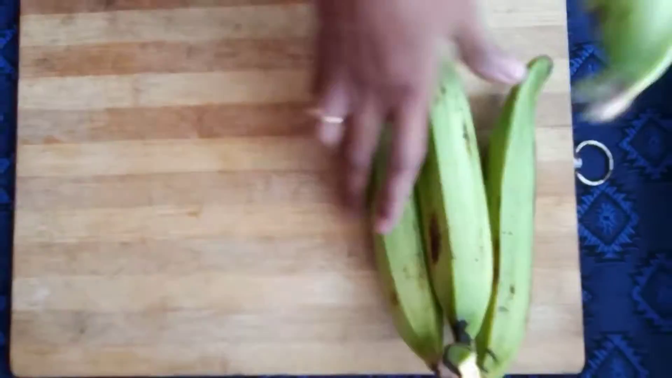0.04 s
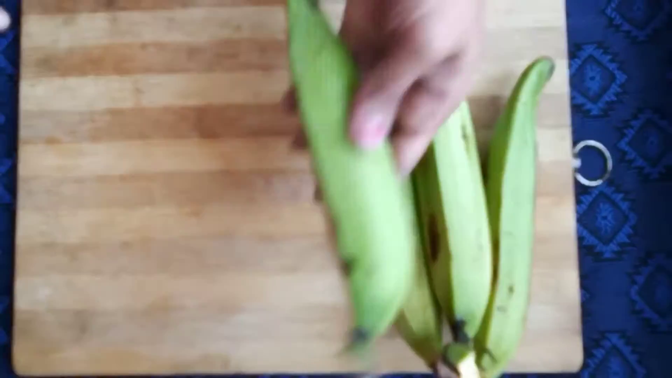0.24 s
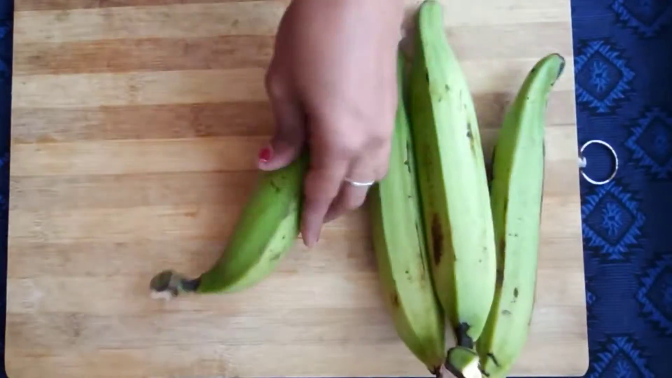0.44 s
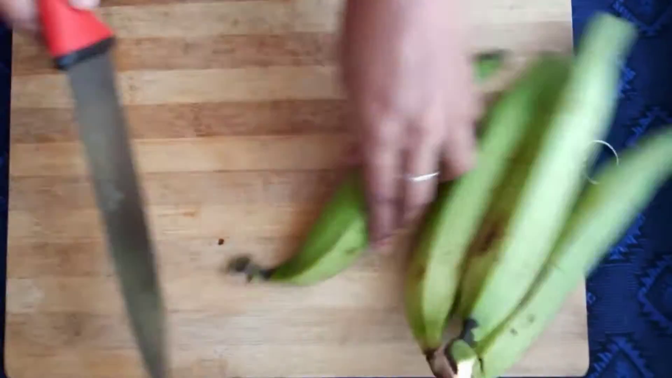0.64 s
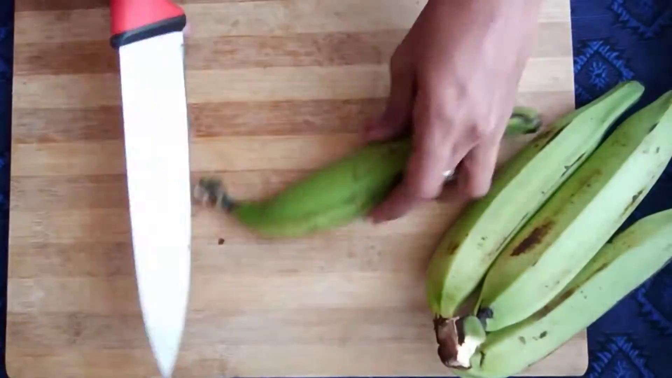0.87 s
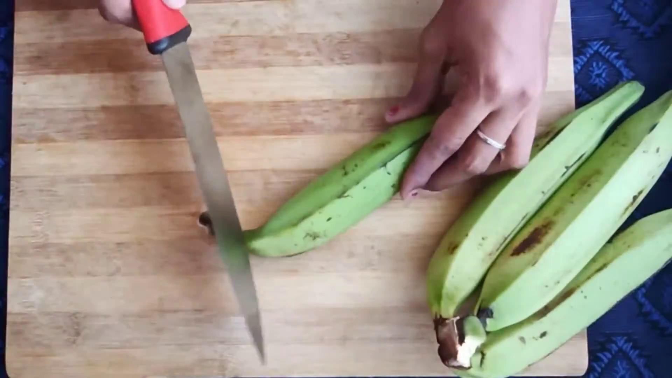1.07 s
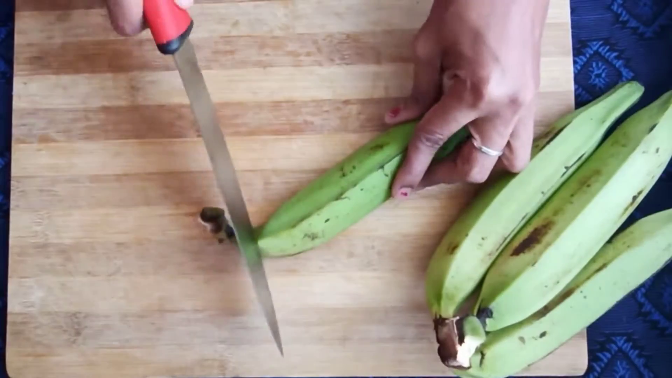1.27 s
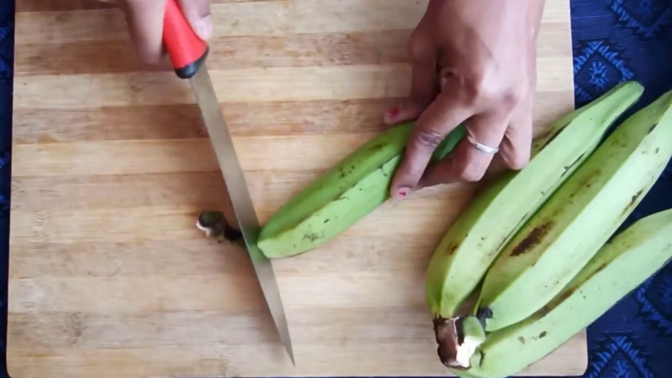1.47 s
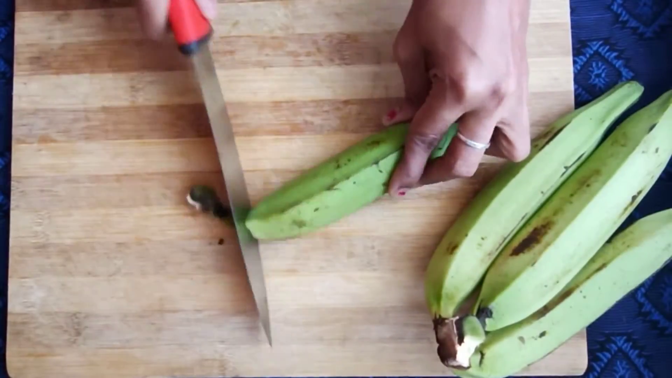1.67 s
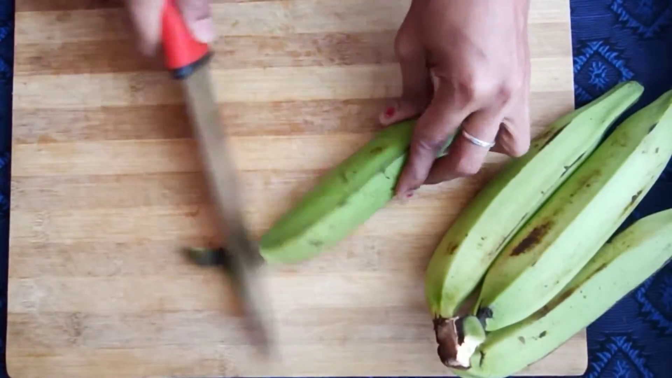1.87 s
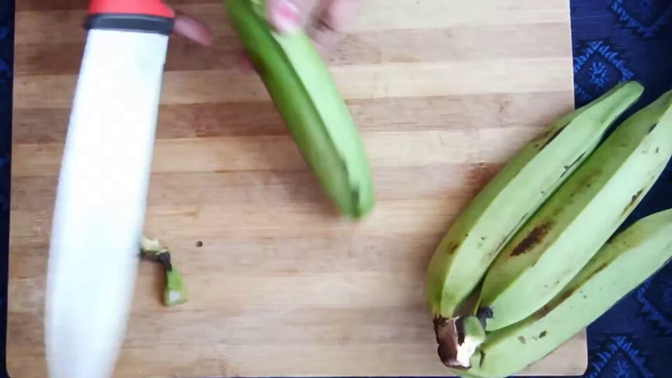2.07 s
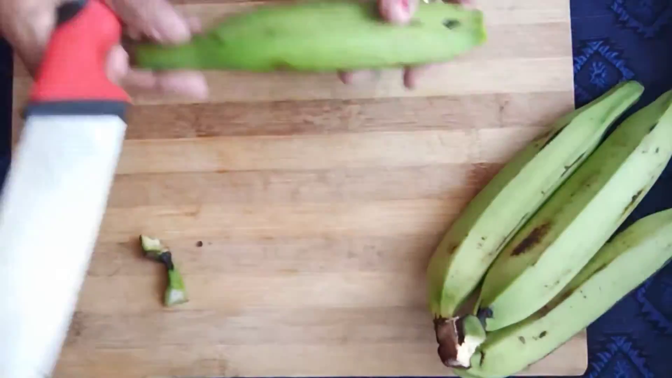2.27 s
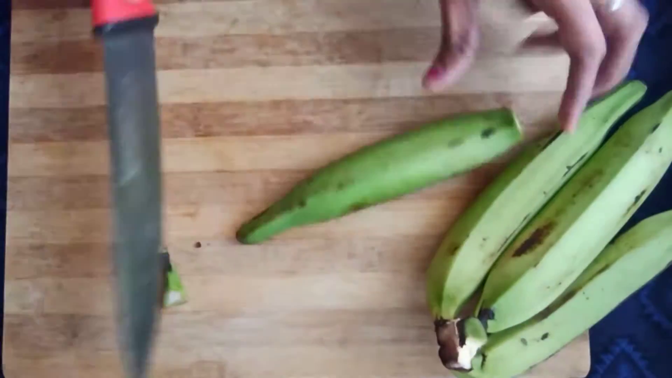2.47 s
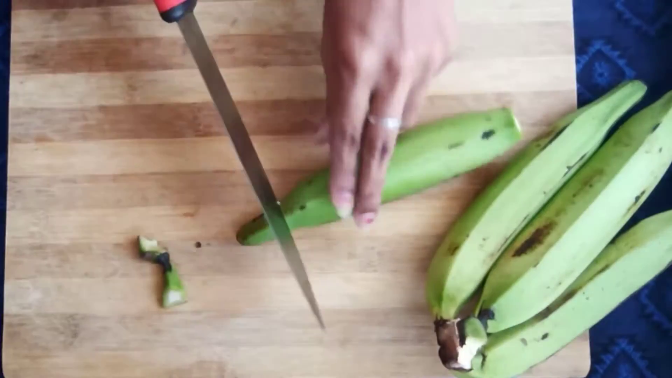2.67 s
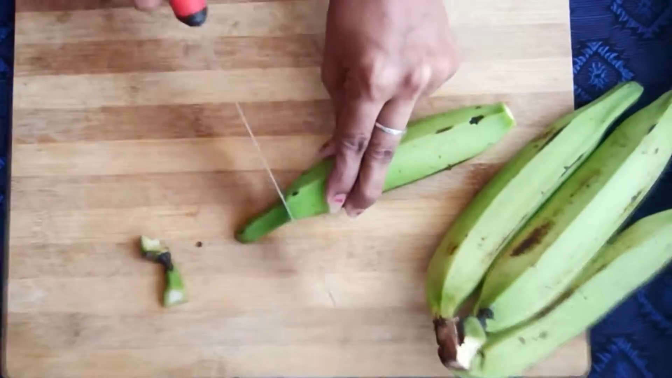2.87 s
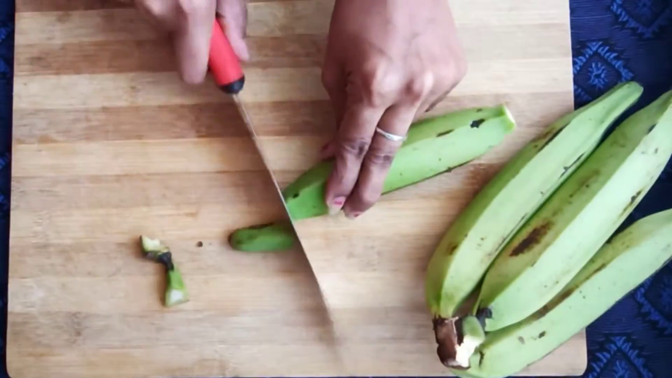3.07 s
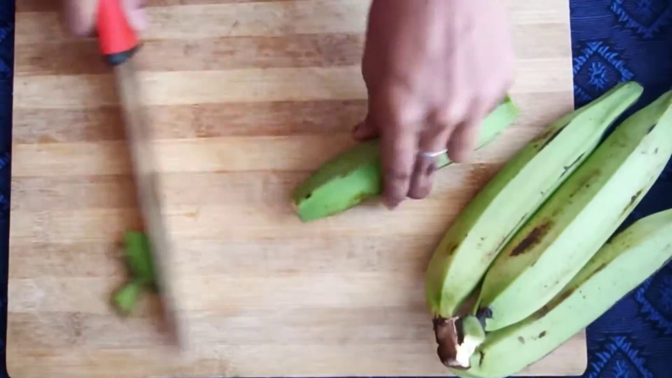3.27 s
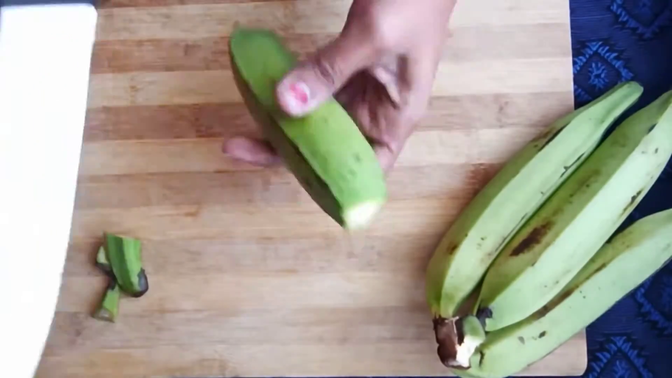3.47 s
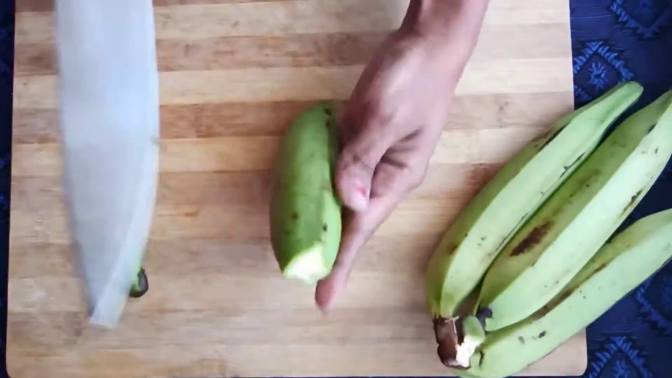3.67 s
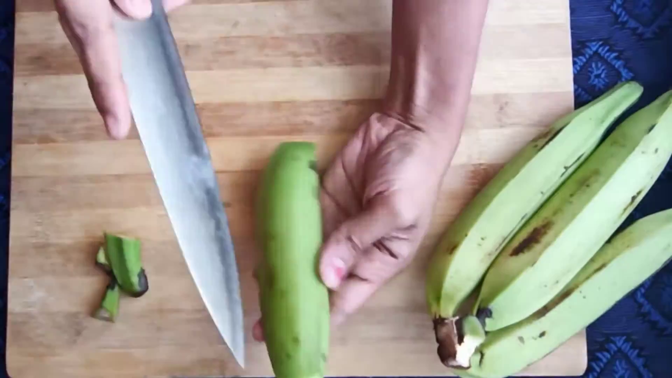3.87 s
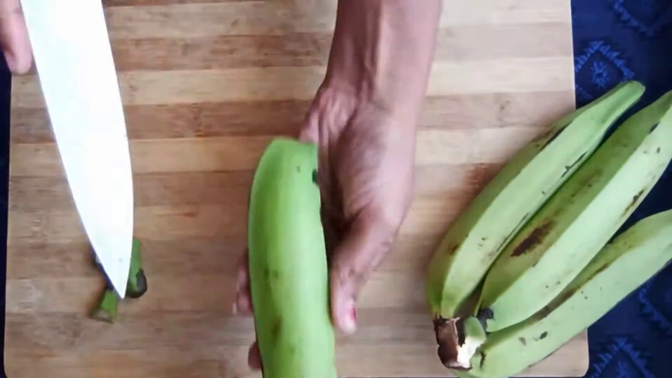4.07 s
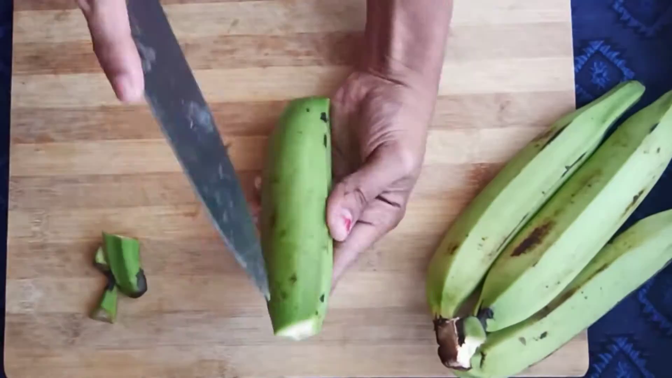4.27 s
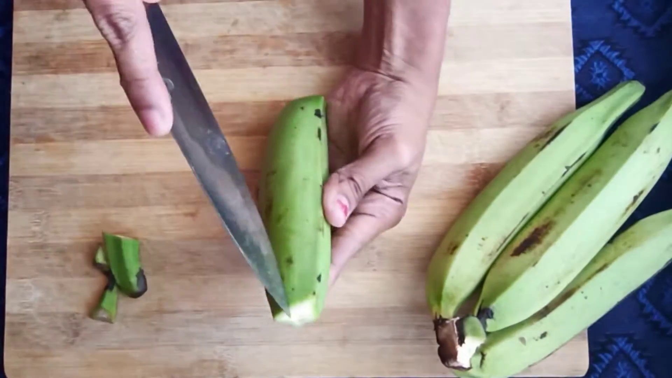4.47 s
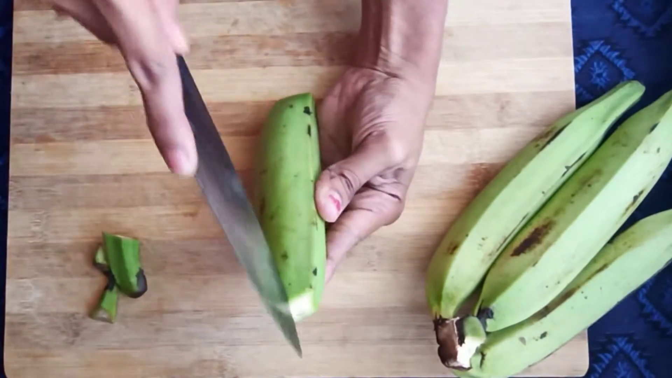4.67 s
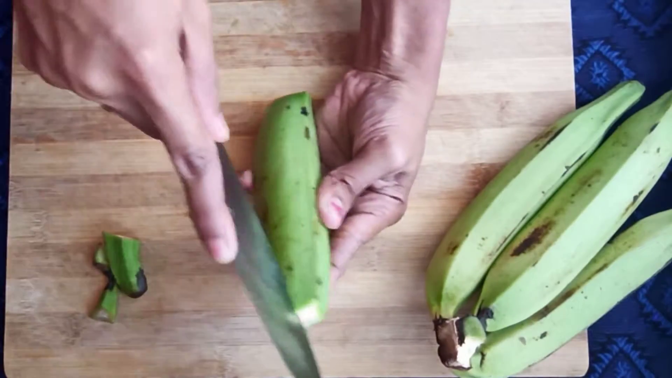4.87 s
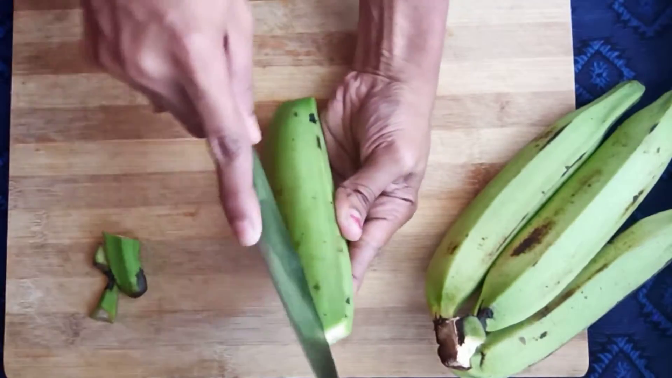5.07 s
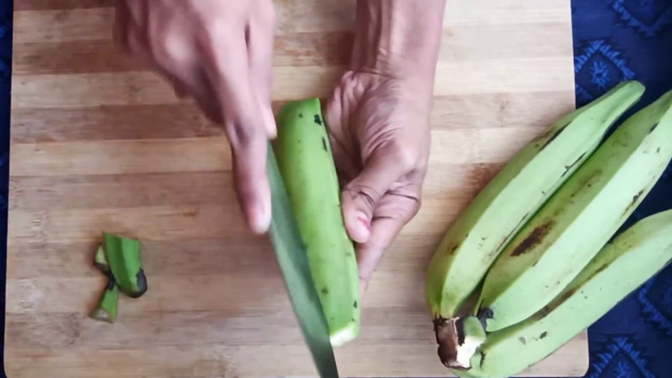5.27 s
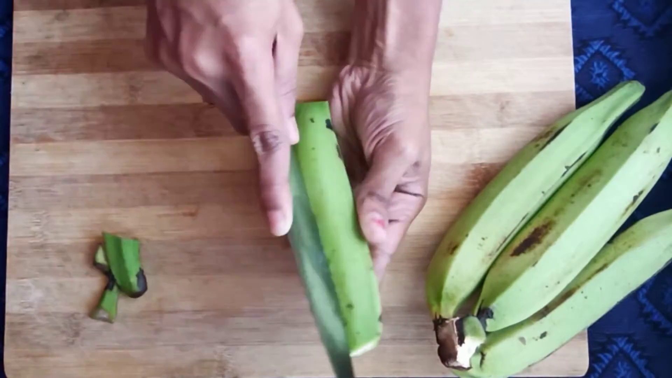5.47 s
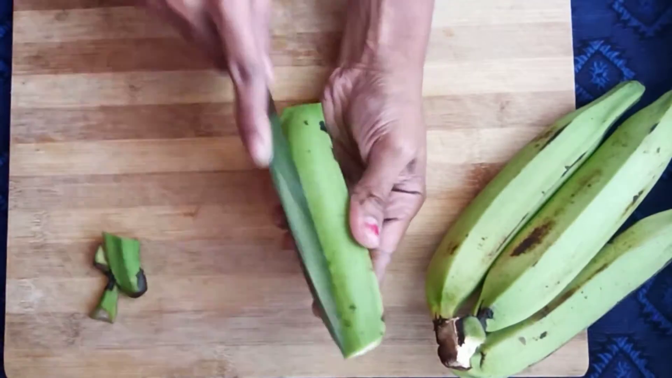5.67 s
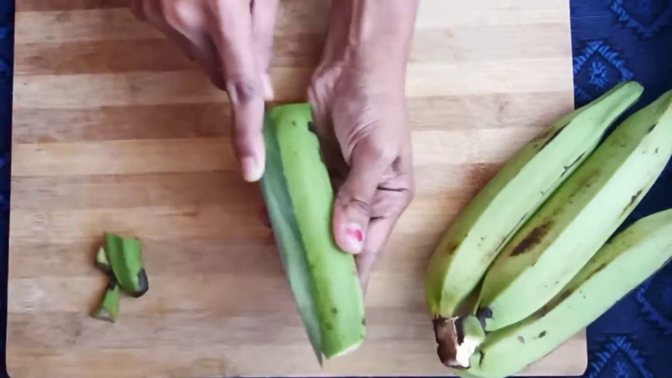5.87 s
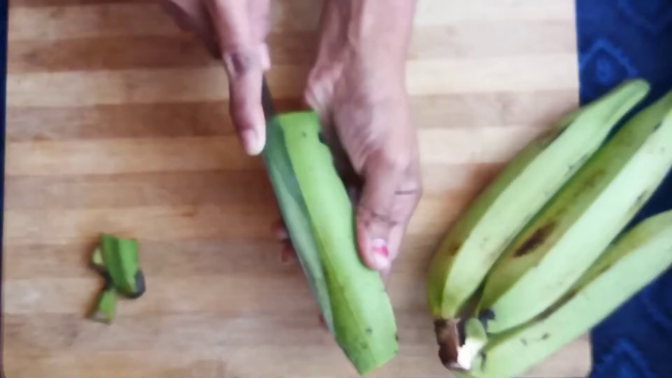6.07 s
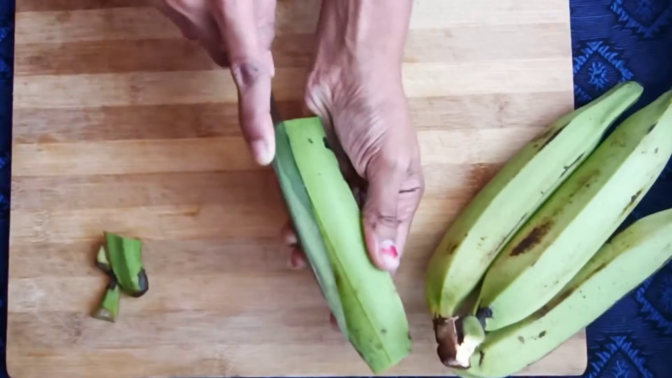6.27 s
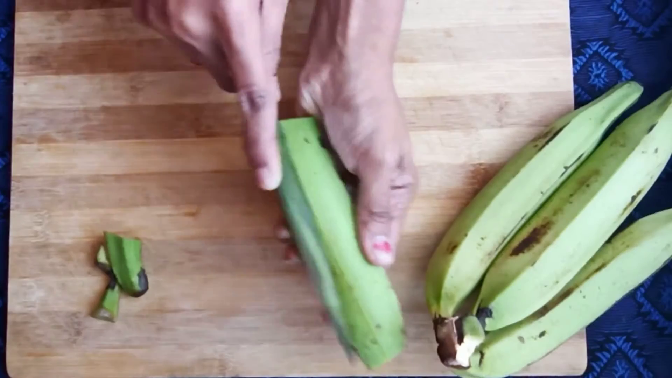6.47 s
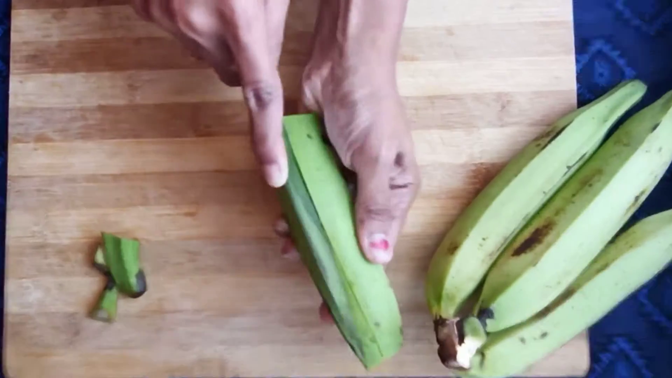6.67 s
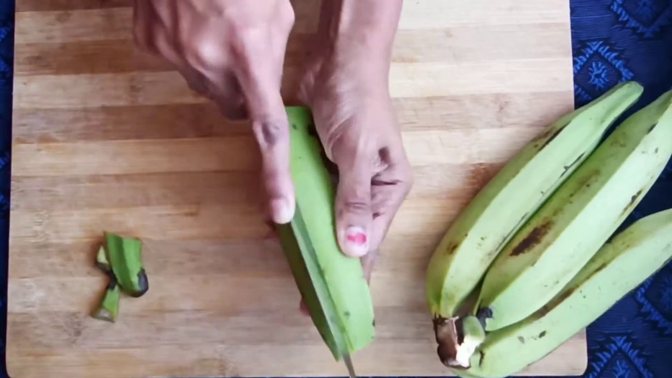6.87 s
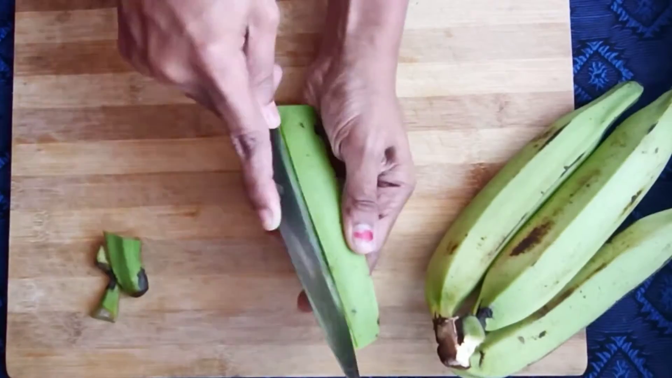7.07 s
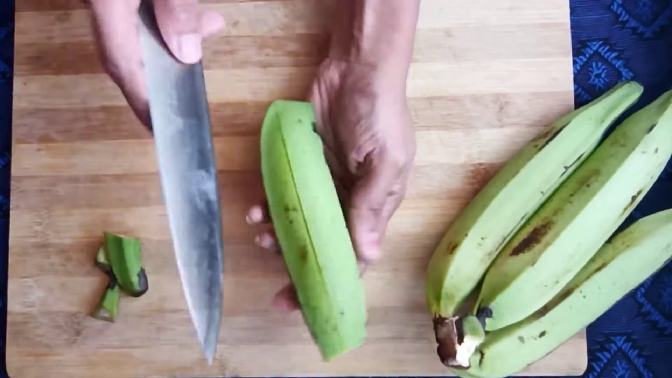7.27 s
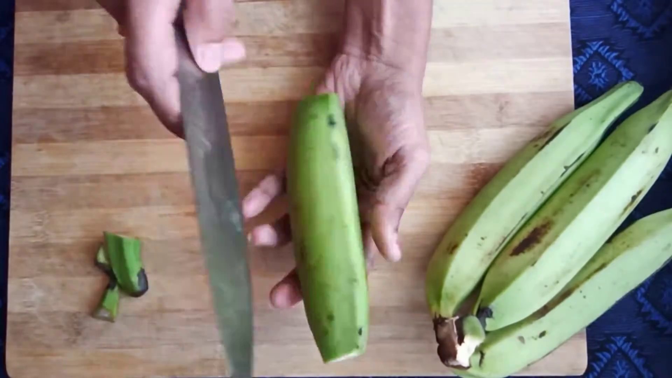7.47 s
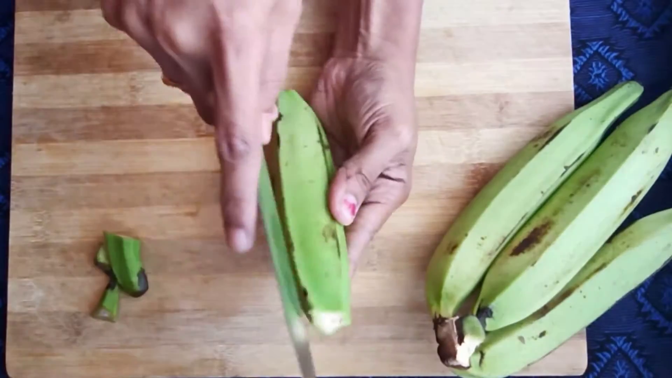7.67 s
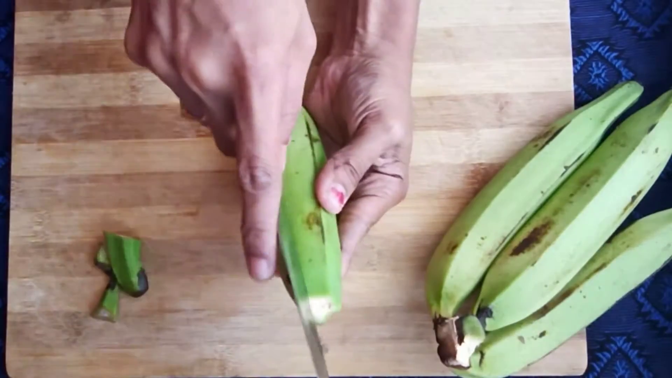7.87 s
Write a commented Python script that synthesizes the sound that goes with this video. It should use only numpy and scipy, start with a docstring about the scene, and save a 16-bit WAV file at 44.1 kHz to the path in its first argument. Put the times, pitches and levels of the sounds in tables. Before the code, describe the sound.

Soft peel rubs, two crunchy cuts ending in loud knife cracks on wood, dull fruit thumps between, then quiet short slitting strokes.

```python
"""A steady room hush and faint rubs of peel come first, as a green banana is pulled from its bunch.
A knife then crunches through each end and cracks onto a wooden board; in between, the fruit is turned and dropped.
Last, the tip of the blade slits the peel lengthwise in short, faint, rasping strokes.
Knocks excite decaying board modes; crunches, rubs and rasps are grains of filtered noise, those of the cuts
also ringing the blade. A quiet kitchen's dense reflections follow, heard close by at two microphones."""
import sys
import numpy as np
from scipy import signal
from scipy.fft import rfft, irfft
from scipy.io import wavfile
from scipy.ndimage import uniform_filter1d, minimum_filter1d

SR = 44100
rng = np.random.default_rng(int(sys.argv[2]) if len(sys.argv) > 2 else 0)


def unload_wav(signal):
    """Save mono or channel-first audio to the path in sys.argv[1] as 16-bit WAV at rate SR, clipped to [-1, 1]."""
    wavfile.write(
        sys.argv[1],
        SR,
        np.round(np.clip(np.atleast_2d(signal).T, -1, 1) * 32767).astype(np.int16),
    )


N = 349272

# pushes of the blade through the ends: (peak time [s], relative crunch level [dB], relative judder level [dB],
# swell over 20 dB [s], fade over 20 dB [s], contact time of a slip [ms])
PUSHES = [(1.356, -39, -40, 0.033, .045, 2), (1.486, -35, -22, 0.071, 0.055, 1.84),
          (1.562, -49, -34.5, 0.006, .025, 1.9), (1.577, -39.5, -39.5, 0.014, 0.033, 1),
          (1.695, -50, -62, 0.048, 0.064, 1), (1.783, -28, -30, 0.027, 0.02, 1.3),
          (1.86, -51, -45, 0.042, 0.15, 1.06), (2.935, -39.5, -31.5, 0.016, 0.034, 1.65),
          (3.005, -46, -32, 0.082, .04, 2.2), (3.044, -32, -31, 0.051, 0.05, 1.14),
          (3.195, -42.5, -67, 0.083, 0.033, 0.89), (3.266, -44, -28, 0.024, 0.033, .92),
          (3.31, -35.5, -28, 0.04, 0.055, 1)]
PUSH_ROUNDNESS = 1.334  # 1 is a pointed peak, 2 a bell


def gain_of(db):
    """Level law: decibels to amplitude."""
    return 10 ** (np.asarray(db) / 20)


def evened(x):
    """Power normalisation: scales to rms 1."""
    return x / np.sqrt(np.mean(x ** 2) + 1e-20)


def read(points, hz):
    """Interpolation of a table over logarithmic frequency, as pitch is heard."""
    f, value = np.transpose(points)
    return np.interp(np.log(hz + 1), np.log(f + 1), value)


def add(mix, s, sound):
    """Superposition: mixes a two-channel sound in at time s."""
    part = mix[:, round(s * SR):][:, :sound.shape[1]]
    part += sound[:, :part.shape[1]]


def colour(x, points, size=2048):
    """Minimum-phase filtering: the log gain fixes the phase of a causal filter."""
    hz = abs(np.fft.fftfreq(size, 1 / SR))
    log_gain = np.log(gain_of(read(points, hz)))
    response = np.exp(np.conj(signal.hilbert(log_gain)))
    taps = np.fft.ifft(response).real
    return signal.oaconvolve(x, taps[None], axes=1)[:, :N]


def low_cut(x, hz):
    """Radiation efficiency: a small board radiates little bass."""
    return signal.sosfilt(signal.butter(2, hz, "high", fs=SR, output="sos"), x)


def ringing(x, modes):
    """Resonance: adds narrow modes (frequency [Hz], width [Hz], level [dB]) to a sound."""
    resonances = 0
    for hz, width, db in modes:
        b, a = signal.iirpeak(hz, hz / width, SR)
        resonances = resonances + gain_of(db) * signal.lfilter(b, a, x)
    return x + resonances


def stroke(s, swell_s, fade_s, roundness=1):
    """Envelope of one movement: peaks at s, 20 dB down at swell_s before and fade_s after."""
    age = np.arange(N) / SR - s
    near = (age > -3 * swell_s) & (age < 3 * fade_s)
    gain = np.zeros(N)
    distance = np.maximum(-age[near] / swell_s, age[near] / fade_s)
    gain[near] = 10 ** -distance ** roundness
    return gain


def seesaw(bright_db):
    """Spectral balance: gains of body and fizz, where brightness trades one for the other."""
    return gain_of(np.array([[-.5], [.5]]) * bright_db)


def body_and_fizz(x, split_hz):
    """Band splitting: a zero-phase low-pass gives the body, the remainder is the fizz."""
    body = signal.sosfiltfilt(signal.butter(2, split_hz, fs=SR, output="sos"), x)
    return body, x - body


def partly_alike(paths, alike):
    """Coherence: two channels share the fraction alike of their power through a third path."""
    return np.sqrt(alike) * paths[2] + np.sqrt(1 - alike) * paths[:2]


def grains(per_s, spread_db, smooth, alike=0.22):
    """Shot noise: tiny fractures of uneven size over a smooth friction hiss."""
    largest = 3  # in units of spread_db
    size = gain_of(spread_db * np.minimum(rng.exponential(1, N), largest))
    fractures = size * (rng.random(N) < per_s / SR)
    signs = rng.choice([-1., 1.], (3, N))
    paths = evened(fractures * signs) + smooth * rng.standard_normal((3, N))
    return evened(partly_alike(paths, alike))


def wandering(lasts_s):
    """Correlated fluctuation: noise averaged over lasts_s, scaled to rms 1."""
    return evened(uniform_filter1d(rng.standard_normal(N), round(lasts_s * SR)))


def catching(depth_db, lasts_s):
    """Stick-slip: the uneven gain of a blade that catches and slips, with depth_db its rms swing."""
    return gain_of(depth_db * wandering(lasts_s))


def hush(hush_db=-49.0, left_db=.5):
    """Diffuse-field coherence: steady room noise, alike in the bass and partly opposed near 1.4 kHz."""
    # correlation of the two channels: (frequency [Hz], left-right likeness [-1 to 1])
    likeness = [(60, 0.69), (130, 0.93), (290, 0.81), (640, 0.43), (1410, -0.43), (3100, 0.039),
                (6820, -0.038), (15000, 0.029)]
    # spectrum of the room: (frequency [Hz], relative level [dB])
    hush_spectrum = [(25, -16.5), (45, -19), (80, 0.5), (140, 3), (270, -3.5), (430, 2.5), (680, -10.5),
                     (1000, -7.5), (1500, -16.5), (2500, -23.5), (4000, -25), (8000, -25.5), (16000, -35.5)]
    hz = np.fft.rfftfreq(N, 1 / SR)
    a, b = rfft(rng.standard_normal((2, N)))
    same = read(likeness, hz)
    pair = np.array([a, same * a + np.sqrt(1 - same ** 2) * b])
    air = irfft(pair * gain_of(read(hush_spectrum, hz)), N)
    return evened(air) * gain_of(hush_db + np.array([[left_db], [-left_db]]))


def kitchen(x, first_s=0.0018):
    """Reverberation: dense reflections from hard walls, each band decaying exponentially at its own rate."""
    # decay over 60 dB: (frequency [Hz], reverberation time [s])
    decay_times = [(150, .26), (600, .23), (1500, .18), (3000, .145), (8000, .17), (15000, .13)]
    # how strongly the kitchen answers: (frequency [Hz], level [dB])
    echo_levels = [(250, -20), (700, -7.5), (1500, -8), (3000, -10), (4500, -8), (12000, -8)]
    taps = rng.choice([-1., 1.], (2, SR // 2))
    taps[:, :round(first_s * SR)] = 0
    hz, t, z = signal.stft(taps, SR, nperseg=256)
    t60 = read(decay_times, hz)[:, None]
    unit = np.sqrt(2 * np.log(1000) / (SR * t60))  # a tail of energy 1
    fading = gain_of(read(echo_levels, hz)[:, None] - 60 * t / t60)
    tail = signal.istft(z * unit * fading, SR, nperseg=256)[1]
    return signal.oaconvolve(x, tail, axes=1)[:, :N]


def placed(x):
    """Interchannel level difference: the two microphones favour different bands of the work."""
    # how much louder the left channel is: (frequency [Hz], level difference [dB])
    balance = [(250, 1.2), (600, 2), (1000, -4.5), (1800, 1.5), (2900, -1.5), (4300, -1), (8000, 2.5),
               (12000, -3)]
    lean_db = read(balance, np.fft.rfftfreq(N, 1 / SR))
    return irfft(rfft(x) * gain_of(np.array([[.5], [-.5]]) * lean_db), N)


def rubbing():
    """Sliding friction: waxy peel under the fingers and over wood gives a fine, soft grain."""
    # fingers and fruit sliding: (peak time [s], level [dB], swell over 20 dB [s], fade over 20 dB [s])
    rubs = [(0.04, -56, 0.1, 0.062), (0.288, -58.5, 0.031, 0.027), (0.53, -57, 0.046, 0.25),
            (0.745, -50, 0.066, 0.067), (0.872, -53, 0.043, 0.049), (1.04, -60.5, 0.054, 0.073),
            (1.182, -60, 0.011, 0.025), (1.943, -47.5, 0.0079, 0.018), (2.278, -58, 0.056, 0.16),
            (3.596, -60, 0.13, 0.095), (3.772, -56.5, 0.069, 0.048)]
    # colour of the friction: (frequency [Hz], relative level [dB])
    rub_spectrum = [(200, -8), (550, 16), (900, 4), (1700, 5.5), (2500, 2), (4000, 3), (7500, 5.5),
                    (12000, -4.5), (16000, -4.5)]
    roundness = 4.3
    speed = sum(gain_of(db) * stroke(s, swell, fade, roundness) for s, db, swell, fade in rubs)
    return speed * evened(colour(grains(per_s=3500, spread_db=4.0, smooth=0.91), rub_spectrum))


def board_ring(apart=0.41, right_lag=.00004, spread_s=0.0011):
    """Modal superposition: the shorter the waves, the less alike they reach the two microphones."""
    # modes of the board: (frequency [Hz], relative level [dB])
    board_modes = [(165, -15), (240, -15), (315, -9), (506, -13.5), (560, -10.5), (750, -9.5), (900, -14.5),
                   (1235, -16), (1450, -7), (1764, -1.5), (2160, -11.5), (2426, -40.5), (2640, -16),
                   (2955, -16.5), (3708, -8.5), (4517, -11.5)]
    # each mode has its own decay; those near 506 Hz ring longest, the highest shortest:
    # (frequency [Hz], decay over 60 dB [s])
    wood_decay = [(165, .06), (240, .075), (315, .06), (506, .1), (560, .05), (800, .025), (1235, .03),
                  (1450, .055), (1764, .028), (2200, .021), (4500, .02)]
    t = np.arange(SR // 6) / SR
    ring = np.zeros((2, len(t)))
    late = np.array([[0], [right_lag]])
    for k, (hz, db) in enumerate(board_modes):
        # the phases drift apart, in alternate directions from mode to mode
        skew = (-1) ** k * apart * min((hz / 1200) ** 2, 1) * np.array([[-1], [1]])
        decay = gain_of(db - 60 * t / read(wood_decay, hz))
        ring -= decay * np.cos(2 * np.pi * hz * (t - late) + skew * (1 - np.exp(-t / spread_s)))
    return ring


def contact(x, ms, q):
    """Mass-spring low-pass: a springy contact passes on only what is slower than its bounce."""
    w = 2 * np.pi * 1000 / (2 * ms)  # the contact lasts half a period
    b, a = signal.bilinear([w * w], [1, w / q, w * w], SR)
    return signal.lfilter(b, a, x)


def impact(ring, db, ms, q, clack_db, clack_s, low_hz, alike=0.55, span_s=0.00047):
    """Impact excitation: a blow rings the main modes and a dense clack; soft contacts leave only the thud."""
    # the wood's many crowded, quickly damped modes: (frequency [Hz], relative level [dB])
    clack_spectrum = [(80, -17.5), (220, -11), (700, -4), (1100, -4.5), (1700, 2), (2300, -0.5), (3000, 4),
                      (3500, -8), (4600, -6.5), (6000, -22.5), (15000, -26)]
    t = np.arange(ring.shape[1]) / SR
    burst = partly_alike(rng.standard_normal((3, len(t))), alike)
    for _ in range(3):  # the crowded modes share the blow evenly: none stands out
        flat = irfft(np.exp(1j * np.angle(rfft(burst))), len(t))
        burst = flat * np.exp(-(t / clack_s) ** 4)
    crowd = evened(colour(burst, clack_spectrum)[:, :len(t)]) * np.sqrt(clack_s / t[-1])
    sound = low_cut(contact(ring + gain_of(clack_db) * crowd, ms, q), low_hz)
    # the strength sets the energy: db is the rms it would have if spread over span_s
    energy = np.mean(np.sum(sound ** 2, axis=1))
    return sound * gain_of(db) / np.sqrt(energy / (span_s * SR))


def blows(ring):
    """Damped impacts: knocks and thuds, where whatever stays lying on the board damps its ring."""
    # knocks and thuds: (time [s], strength [dB], contact time [ms], springiness [Q], damping time [s])
    knocks = [(.706, -25, 2.5, 2.7, 0.058), (.866, -31.5, 0.97, 2.8, 0.023), (1.191, -33, 4.7, 1.4, .015),
              (1.357, -22, 1.07, 4, 0.042), (1.428, -31, 2.5, 2.3, .01), (1.4475, -22.5, 2.5, 2.5, .011),
              (1.4632, -21.5, 2, 2.8, .012), (1.4723, -12.5, 1.7, 2.5, 0.0097),
              (1.4847, -13.5, 1.7, 2.3, 0.0087), (1.4929, -12, 1.82, 1.8, .014), (1.578, -23, 0.7, 2, .02),
              (1.638, -26.5, 1.7, 1.5, .018), (2.154, -27, 1.04, 1.3, 0.011),
              (2.3745, -23.5, 0.1, 0.33, .011), (2.378, -20.5, .61, .58, 0.018), (2.381, -28, 2, 2.7, .02),
              (2.385, -28, 0.73, 1.5, 0.018), (2.4214, -12, 0.86, 3.2, .012),
              (2.4253, -11, .91, 4.1, 0.034), (2.521, -9, 2.5, 1.8, 0.01), (2.527, -20, 1, 4.5, 0.0073),
              (2.544, -19, 4.4, 2.1, .01), (2.549, -21.5, 1.56, 0.78, 0.014), (2.812, -34, 3.1, 2, .015),
              (2.932, -19.5, 2.2, 1.8, .016), (2.938, -26, 1, 4, .02), (2.983, -28.5, 2.3, 2.5, .01),
              (3.005, -22.5, 2.1, 2.5, .018), (3.2568, -26, 0.82, 2.8, .015),
              (3.2745, -27, 0.83, 3.2, .015), (3.301, -24.5, 0.98, 4, .05), (4.223, -30.5, 1.27, 0.83, .02)]
    out = np.zeros((2, N))
    t = np.arange(ring.shape[1]) / SR
    for s, db, ms, q, damp_s in knocks:
        damped = ring * np.exp(-t / damp_s)
        add(out, s, impact(damped, db, ms, q, clack_db=-6, clack_s=.008, low_hz=104.6))
    return out


def slitting(slit_db=1, split_hz=5000):
    """Progressive fracture: the tip parts the peel, a soft rasp that swells and fades unevenly with each stroke."""
    # short advances of the tip: (peak time [s], relative level [dB], length [s], brightness [dB])
    slits = [(4.855, -59.5, .07, 0), (4.91, -62, 0.054, -2), (5.092, -61.5, .07, 0),
             (5.194, -59, 0.058, -1), (5.273, -57.5, .08, 3), (5.374, -52, .05, 3),
             (5.431, -46.5, 0.035, 2), (5.466, -57, 0.056, 1), (5.69, -52, 0.15, -2.5),
             (5.745, -54, .04, -6), (5.792, -43, 0.03, -4.5), (5.844, -49, .022, -11),
             (5.934, -52.5, 0.039, -5), (5.957, -49.5, 0.052, 1), (6.054, -55, 0.027, 10),
             (6.491, -45.5, 0.063, -3.5), (6.589, -59, .04, -1), (6.7, -53.5, 0.056, -11),
             (6.842, -50.5, 0.075, -4), (6.918, -58, .03, -3), (6.956, -59.5, .02, 8),
             (7.066, -45.5, 0.038, 9), (7.418, -65.5, 0.038, 10)]
    # long, light drags of the tip under the peel:
    # (peak time [s], level [dB], swell over 20 dB [s], fade over 20 dB [s], brightness [dB])
    drags = [(4.88, -64.5, 0.22, 0.26, -1), (5.27, -64.5, 0.25, .24, -3), (5.73, -56.5, .09, 0.12, -3),
             (6.03, -72, .12, 0.13, -12), (6.92, -69, .16, 0.23, -1)]
    # colour of the parting peel: (frequency [Hz], relative level [dB])
    peel_spectrum = [(600, -14), (1700, -1), (2050, 5.5), (2500, 2), (3000, 0), (4200, 3.5), (7500, 3.5),
                     (12000, -8.5), (16000, -0.5)]
    # the rasp is slightly hollow: (frequency [Hz], width [Hz], level [dB])
    slit_ring = [(2115, 120, 0), (2850, 91, 2)]
    swell_share, slit_roundness, drag_roundness = 0.45, 1.31, 2.6
    advance, drag = np.zeros((2, N)), np.zeros((2, N))
    for s, db, length, bright_db in slits:
        push = stroke(s, swell_share * length, (1 - swell_share) * length, slit_roundness)
        advance += gain_of(slit_db + db) * seesaw(bright_db) * push
    for s, db, swell, fade, bright_db in drags:
        drag += gain_of(db) * seesaw(bright_db) * stroke(s, swell, fade, drag_roundness)
    force = np.hypot(advance, drag * catching(depth_db=2, lasts_s=.03))
    cells = grains(per_s=1800, spread_db=4.2, smooth=.5) * catching(depth_db=1.5, lasts_s=.006)
    rasp = evened(ringing(colour(cells, peel_spectrum), slit_ring))
    body, fizz = body_and_fizz(rasp, split_hz)
    return force[0] * body + force[1] * fizz


def juddering(ring, judder_db=-6):
    """Stick-slip oscillation: the pushed blade slips a few hundred times a second, each slip shaking the board."""
    slips_per_s, jitter = 245, 0.24  # jitter is the relative rms swing of the rate
    rate = slips_per_s * (1 + jitter * wandering(lasts_s=.004))
    slips = np.diff(np.floor(np.cumsum(rate) / SR), prepend=0)
    shake = low_cut(signal.oaconvolve(ring, slips[None], axes=1)[:, :N], hz=127.0)
    shake = shake * catching(depth_db=6.0, lasts_s=.008)
    out = np.zeros((2, N))
    for s, _, db, swell, fade, ms in PUSHES:
        push = gain_of(judder_db + db) * stroke(s, swell, fade, PUSH_ROUNDNESS)
        out += push * evened(contact(shake, ms, q=2.5))
    return out


def chops(ring):
    """Hard impact: the blade breaks through and cracks on the wood; the cut stem chatters in uneven bounces."""
    # the blade meets the board: (time [s], strength [dB], contact time [ms], length of the clack [s])
    strikes = [(1.7885, -3, 0.2, 0.005), (1.7973, -17, 0.17, 0.0053), (3.0513, 0.5, 0.23, 0.0069)]
    rattle_from_s, rattle_to_s, bounces_per_s = 1.806, 1.92, 360
    rattle_db, fade_db_per_s = -23.5, 220
    out = np.zeros((2, N))
    for s, db, ms, clack_s in strikes:
        add(out, s, impact(ring, db, ms, q=1.0, clack_db=3, clack_s=clack_s, low_hz=229.3))
    slots = np.arange(round((rattle_to_s - rattle_from_s) * bounces_per_s))
    for age in (slots + rng.random(len(slots))) / bounces_per_s:
        db = rattle_db - fade_db_per_s * age
        bounce = impact(ring, db, ms=0.15, q=0.63, clack_db=0, clack_s=0.0056, low_hz=280)
        add(out, rattle_from_s + age, bounce)
    return out


def cutting(crunch_db=-5, tick_db=-3, split_hz=5600):
    """Fracture and friction driving resonance: bursting cells, snapping fibres and scuffs, with the blade's modes."""
    # short bursts, bright or dull: fibres snapping, peel scuffing as the fruit lands:
    # (time [s], level [dB], brightness [dB], fade over 20 dB [s])
    bursts = [(.453, -46.5, -1, 0.0093), (1.353, -31, -5, 0.0065), (1.3575, -32, -4, .006),
              (1.446, -35.5, 3, .005), (1.4698, -28.5, 2, .006), (1.4828, -25.5, -2, 0.0033),
              (1.4925, -31, 1, 0.0076), (1.503, -32.5, 1.5, 0.0045), (1.5085, -37, -10, .004),
              (1.56, -37, 10, .007), (1.579, -25, 6.5, 0.0055), (1.6367, -26.5, 5.5, 0.0089),
              (1.7861, -19.5, -3, 0.0065), (2.155, -40.5, 8, 0.0081), (2.3749, -34, -12, .012),
              (2.4239, -39, -11, .007), (2.522, -47, -11, 0.012), (2.5483, -52, -11, .007),
              (2.936, -40, -9.5, 0.0063), (3.008, -40, -5, 0.0069), (3.039, -34, -11, .007),
              (3.05, -31, -19, .007), (3.3035, -51, -9, 0.0093)]
    # the dry stem crunches brighter than the moist tip: (time [s], brightness [dB])
    cut_brightness = [(1.7, -3), (2.9, -4)]
    # colour of the crunch: (frequency [Hz], relative level [dB])
    crunch_spectrum = [(200, -48), (600, 5), (1000, -7), (1450, -5), (2400, -1.5), (3000, -4), (3600, -3.5),
                       (4500, -2.5), (7500, -1), (12000, -8), (16000, -5)]
    # the blade's modes depend on what grips it: (frequency [Hz], width [Hz], level entering the stem [dB],
    # level deep in it [dB], level in the tip [dB], level sliding free [dB])
    blade_modes = [(1430, 86, 2, 8, -11, -14.5), (1770, 72, -6, 8.5, 5, 4), (2944, 50, 9.5, 13, -8, 11),
                   (3634, 96, 2.5, -12.5, 4.5, -12), (3960, 96, -7, -6, -9.5, 3), (4580, 81, 2, 3.5, 8, 5),
                   (6660, 160, 1, 0.5, 1.5, 1), (7360, 295, 1, -6, -18.5, 0),
                   (8300, 120, -10, 6, -20.5, -6)]
    # when the blade passes from one grip to the next: (time [s])
    grip_starts = [1.54, 2.8, 3.23]
    burst_rise_s = 0.0023
    force, ticks = np.zeros((2, N)), np.zeros((2, N))
    for s, db, _, swell, fade, _ in PUSHES:
        bright_db = np.interp(s, *np.transpose(cut_brightness))
        force += gain_of(crunch_db + db) * seesaw(bright_db) * stroke(s, swell, fade, PUSH_ROUNDNESS)
    for s, db, bright_db, fade in bursts:
        force += gain_of(db) * seesaw(bright_db) * stroke(s, burst_rise_s, fade)
        add(ticks, s, gain_of(tick_db + db + bright_db) * np.ones((2, 1)))
    cells = grains(per_s=3600, spread_db=3.6, smooth=0.35) * catching(depth_db=1.4, lasts_s=0.004)
    body, fizz = body_and_fizz(evened(colour(cells, crunch_spectrum)), split_hz)
    crunch = force[0] * body + force[1] * fizz + colour(ticks, crunch_spectrum)
    grip = np.searchsorted(grip_starts, np.arange(N) / SR)
    out = np.zeros((2, N))
    for k in range(len(grip_starts) + 1):
        modes = [(hz, width, levels[k]) for hz, width, *levels in blade_modes]
        out += ringing(crunch * (grip == k), modes)
    return out


def scene():
    """Superposition of the work on the board, its reflections and the background."""
    ring = board_ring()
    work = blows(ring) + chops(ring) + cutting() + juddering(ring) + rubbing() + slitting()
    return placed(work + kitchen(work)) + hush()


def record(dry):
    """Transduction: hollows in the treble, a fast peak limiter that holds down the chops, and a band limit."""
    # response of the microphones: (frequency [Hz], level [dB])
    response = [(4600, -0.5), (5200, -9), (6300, -1), (8300, -2), (8900, -7.5), (10000, -15), (11200, -27),
                (11800, 1.5)]
    ceiling, edge_hz = .72, 15800
    heard = colour(dry, response)
    allowed = ceiling / np.maximum(abs(heard).max(axis=0), ceiling)
    # the gain glides over 45 samples, so no edge is added
    heard = heard * uniform_filter1d(minimum_filter1d(allowed, size=45), size=45)
    band = signal.firwin(511, edge_hz, window=("kaiser", 9), fs=SR)
    return signal.oaconvolve(heard, band[None], "same", axes=1)


dry = scene()
out = record(dry)
unload_wav(out)
```